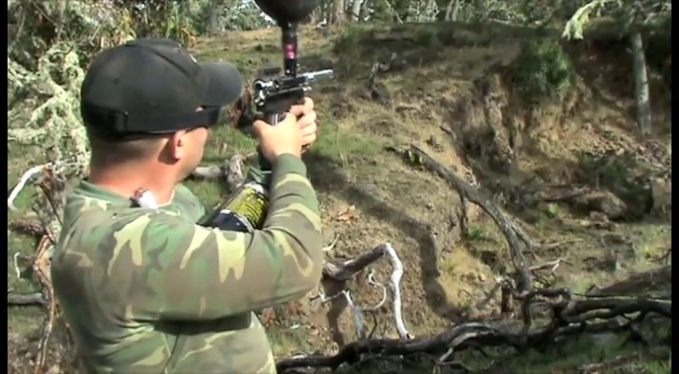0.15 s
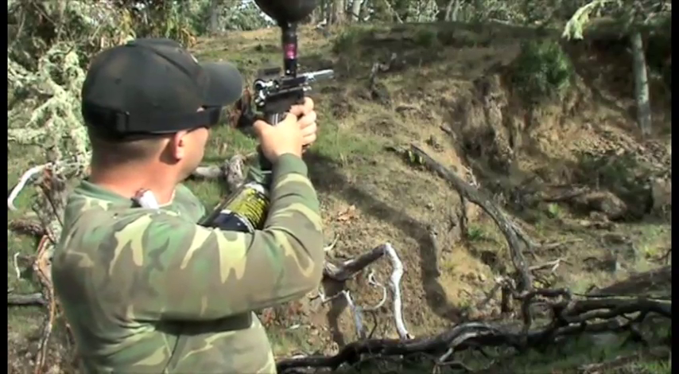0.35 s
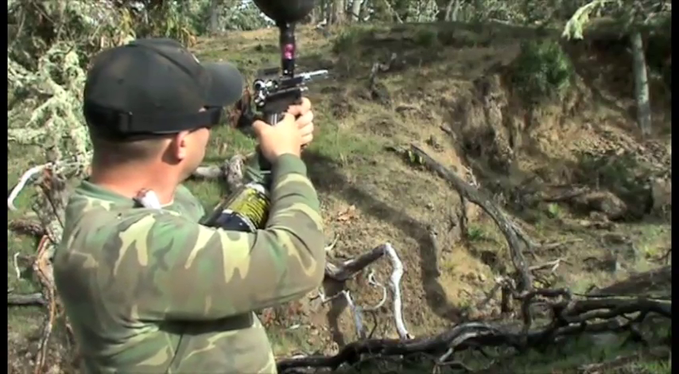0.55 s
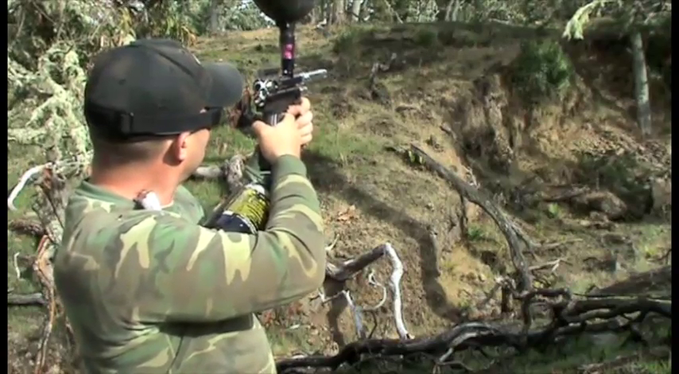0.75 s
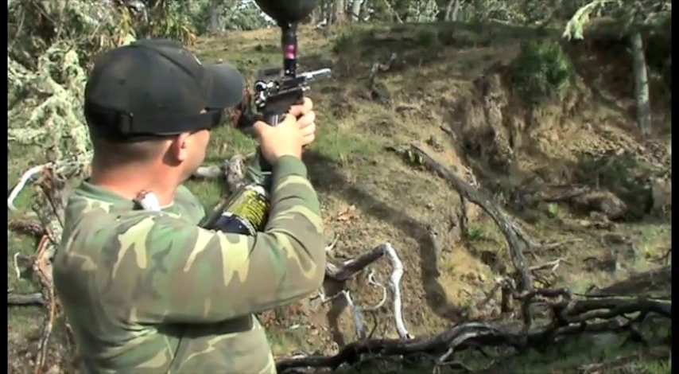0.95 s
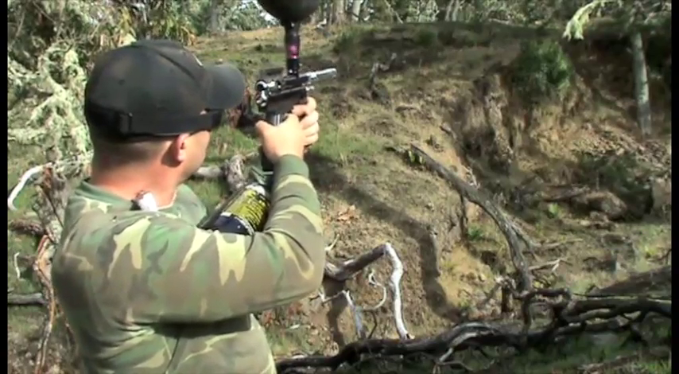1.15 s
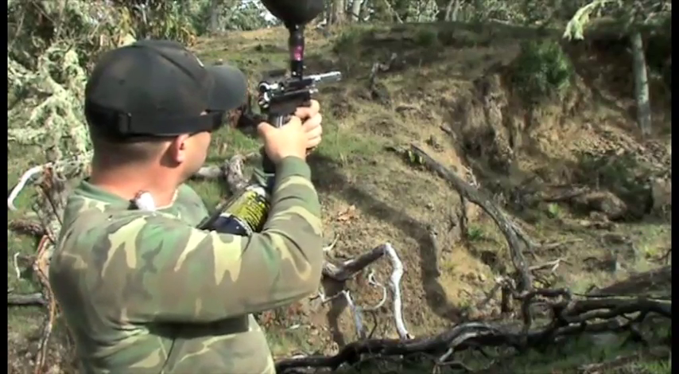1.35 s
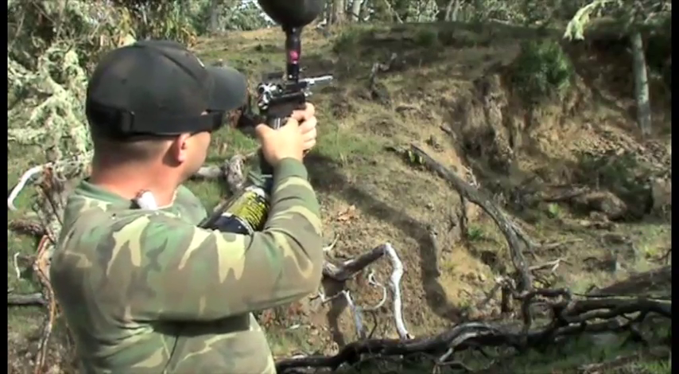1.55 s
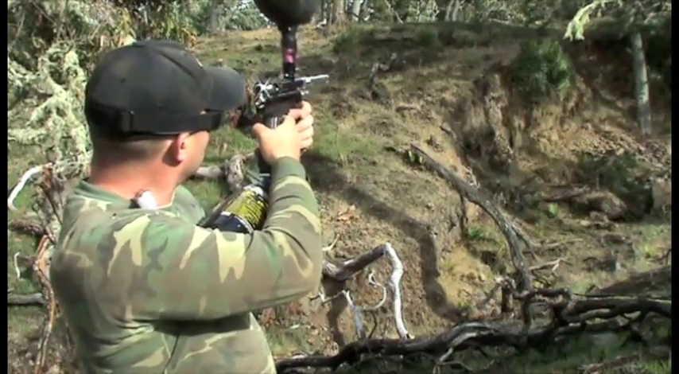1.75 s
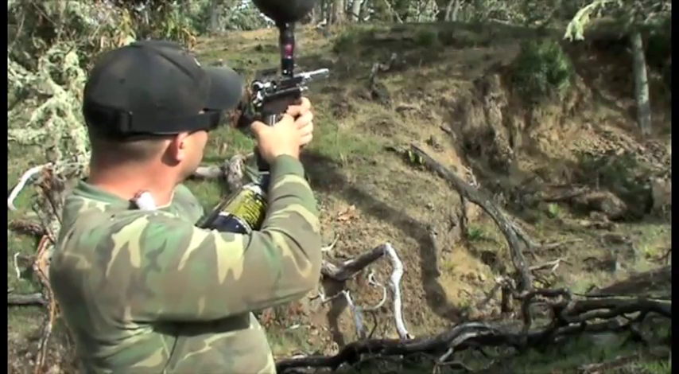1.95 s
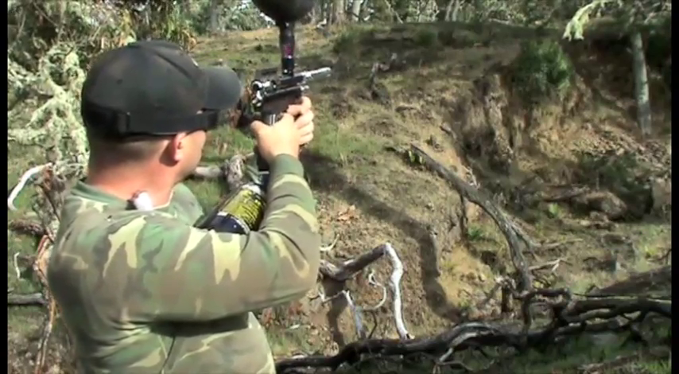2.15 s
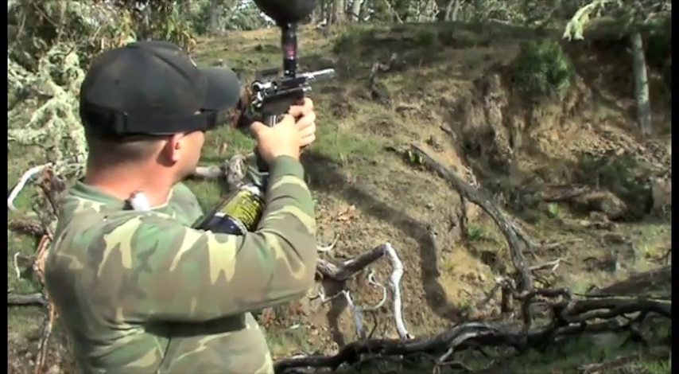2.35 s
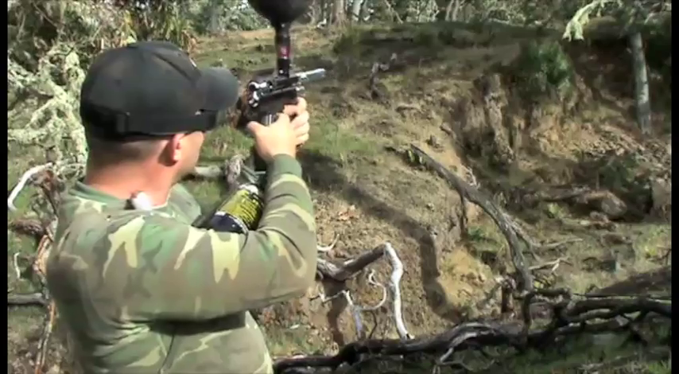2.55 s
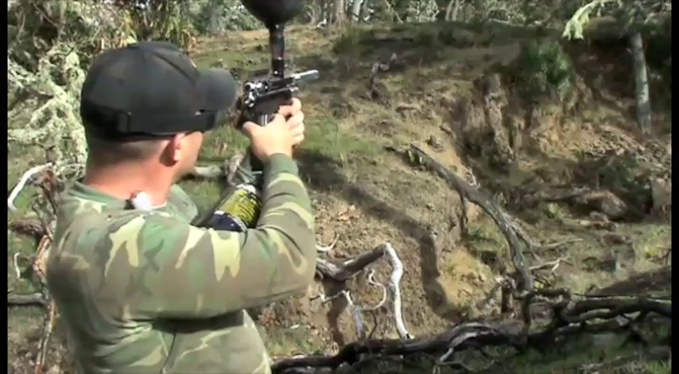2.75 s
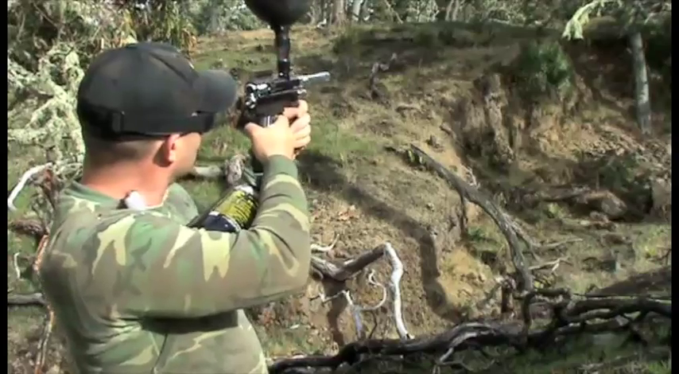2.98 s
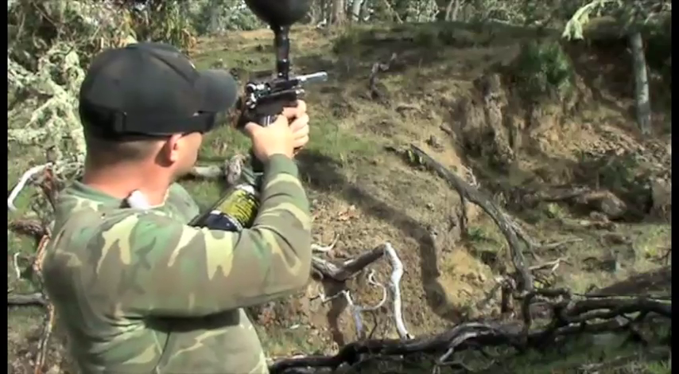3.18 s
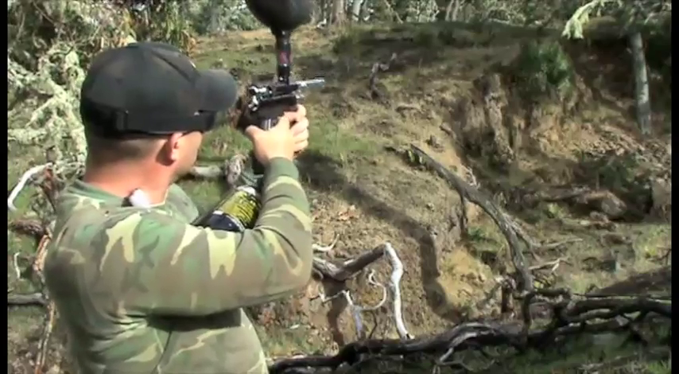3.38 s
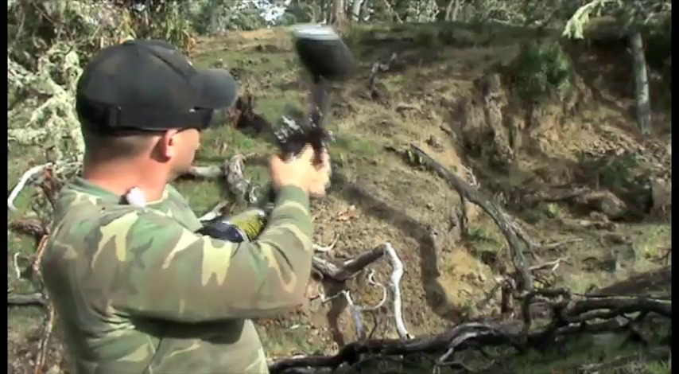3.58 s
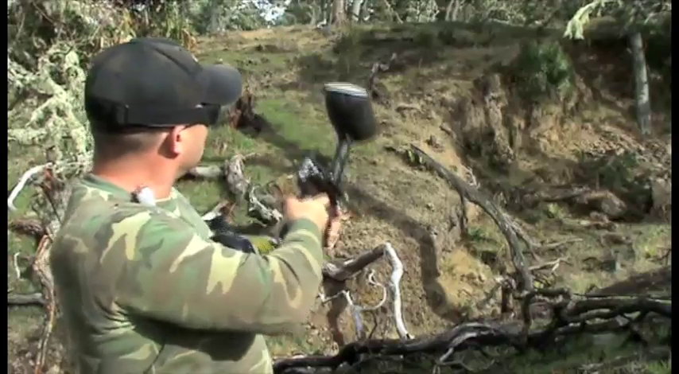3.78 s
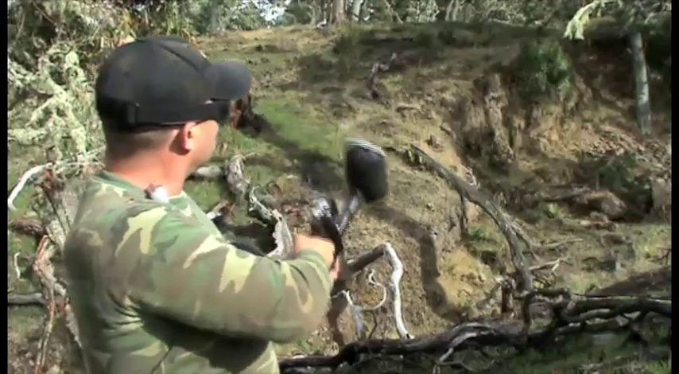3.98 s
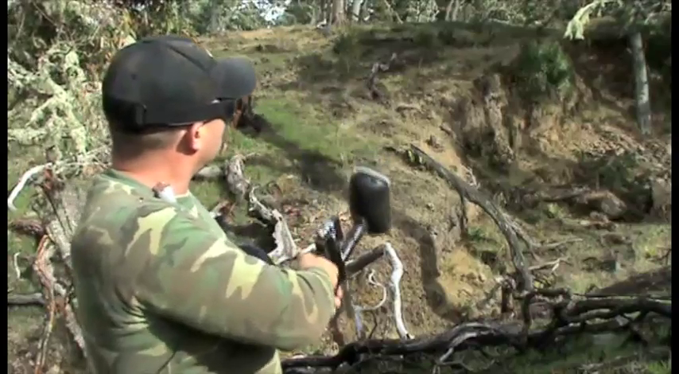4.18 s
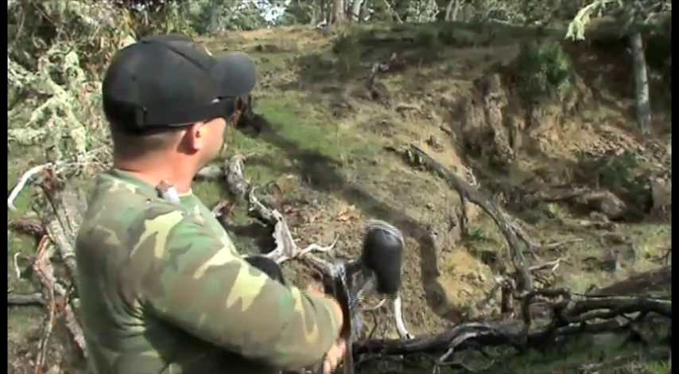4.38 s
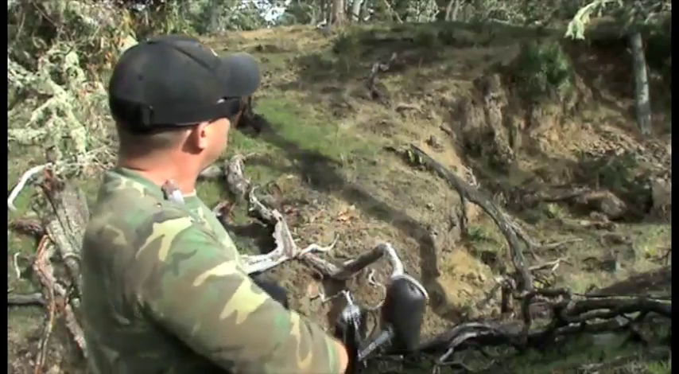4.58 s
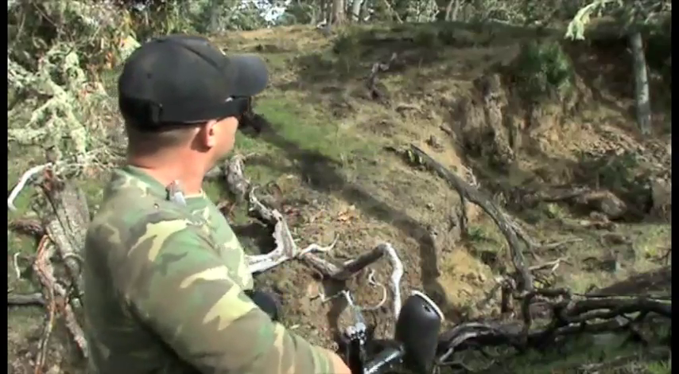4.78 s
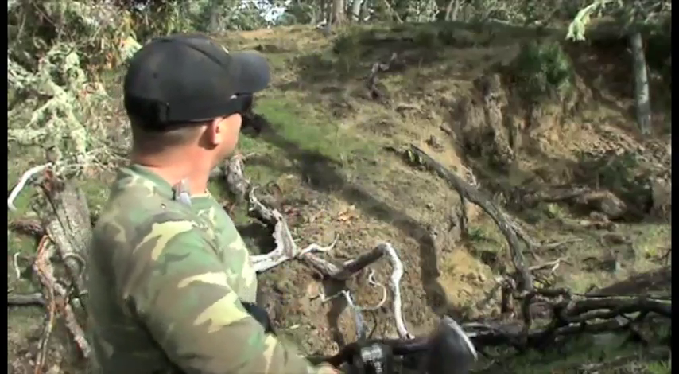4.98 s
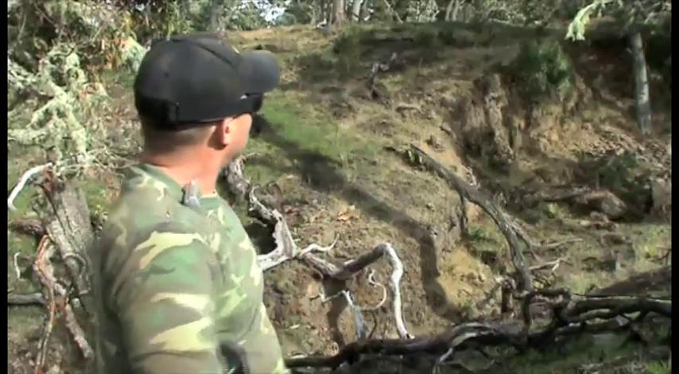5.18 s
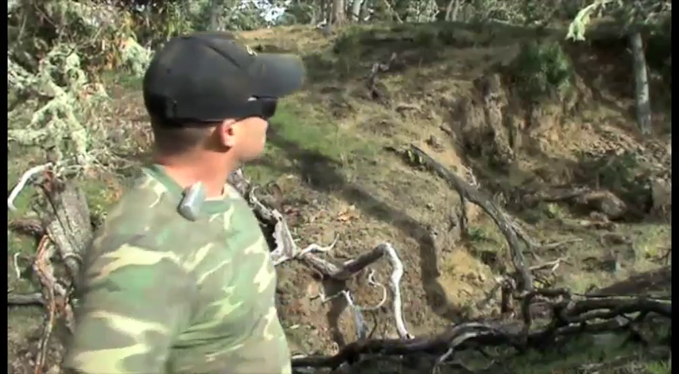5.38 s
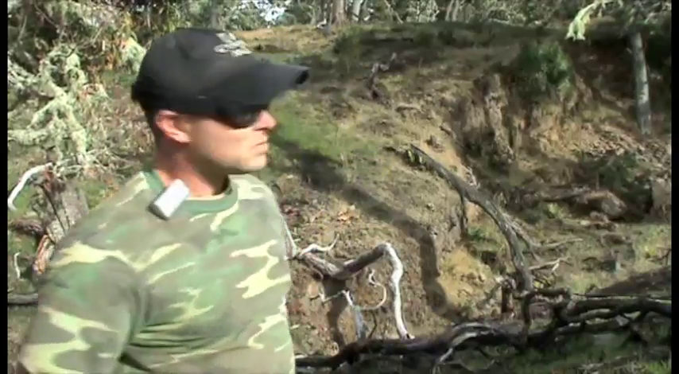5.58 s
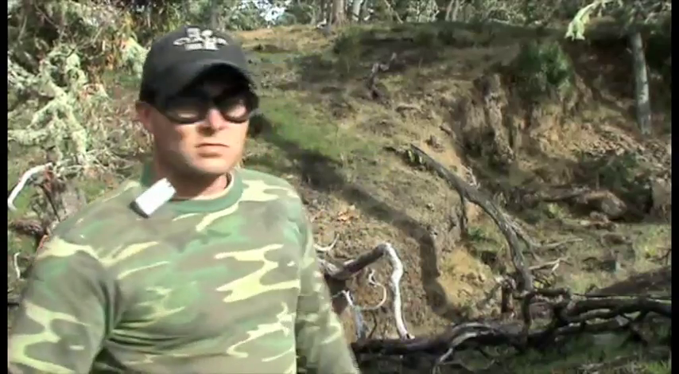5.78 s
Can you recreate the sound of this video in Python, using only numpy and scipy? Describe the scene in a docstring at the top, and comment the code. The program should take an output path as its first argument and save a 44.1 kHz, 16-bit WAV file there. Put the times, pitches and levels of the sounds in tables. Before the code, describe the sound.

A compressed-air paintball gun fires fifteen sharp cracking shots outdoors, spaced then rapid, last two hollow, followed by quiet hiss and small handling knocks.

```python
"""Fifteen shots of a compressed-air paintball gun, close and slightly overloaded, echo off a wooded bank.
Each shot: sear click, swelling leak, fluttering jet that rings the barrel, bolt slam; the metal rings on.
Gas pressure sags shot by shot; balls tick in the hopper; the last two shots sound hollow.
Then the lowered gun gives small knocks, and clothing bumps softly, over air, hiss and a faint whine.
Sources are damped sine modes and coloured noise bursts; echoes are a convolution."""
import sys
import numpy as np
from scipy import signal
from scipy.fft import rfft, irfft
from scipy.io import wavfile

SR = 44100
rng = np.random.default_rng(int(sys.argv[2]) if len(sys.argv) > 2 else 0)


def dump(signal):
    """Clip the signal to [-1, 1] and save it as 16-bit WAV at the path in sys.argv[1]."""
    limited = np.clip(np.atleast_2d(signal).T, -1, 1)
    pcm = np.round(limited * 32767).astype(np.int16)
    wavfile.write(sys.argv[1], SR, pcm)


N = 257103
T = np.arange(N) / SR
RING = T[:SR]  # 1 s

# shots: start_s, sear_db, spring_ping_db, hollow (0 to 1)
SHOTS = [(.0350, -3.5, 1.5, 0.038), (0.4113, -2, 3, 0), (0.7861, -2.5, 0, 0.089),
         (1.1047, -5, -0.5, 0.0047), (1.2884, -6.5, -13, 0), (1.4765, -7, -4, 0.038),
         (1.6950, -7, 2, 0.0033), (2.0948, -5.5, -11.5, 0.04), (2.3005, -5.5, -7.5, 0.021),
         (2.4774, -5.5, 1.5, 0.033), (2.6486, -5.5, -0.5, 0), (2.8334, -4.5, -8.5, 0.011),
         (3.0114, -6, -12.5, 0), (3.1881, -7, -1, 0.94), (3.3654, -7, -4.5, 0.96)]
# barrel air column, full shot: pitch_hz, level_db, t60_s
BARREL = [(385.2, -22, 0.052), (573.7, -39, .04), (747.3, -11.5, 0.045), (1957, -19.5, 0.017),
          (3132, -16.5, 0.019)]
# barrel air column, hollow shot: pitch_hz, level_db, t60_s
HOLLOW = [(185.6, -9.5, 0.025), (789, -23.5, 0.087), (977, -15, .04), (2038, -21, 0.0518)]
# breech air knocked by the returning bolt: pitch_hz, level_db, t60_s
BREECH = [(412, -35.5, .035), (639.7, -22.5, 0.03), (859.7, -14, 0.019), (1220, -30, 0.087)]
# ringing metal of the gun: pitch_hz, mean_level_db, t60_s
METAL = [(1012, -47.5, .95), (1325, -43, .15), (2864, -46, .22), (3381, -54, .5), (5582, -54, .27)]
# high ping of the spring: pitch_hz, level_db, t60_s
PING = [(7381, -45.5, .3)]
# plastic hopper and stock: pitch_hz, level_db, t60_s
HOPPER = [(336.3, -20, .15), (556, -47.5, 0.0276), (748.5, -25, 0.035), (953, -6.5, .025),
          (1364, -7.5, 0.016), (1710, -11.5, 0.018), (2080, -10.5, 0.028), (2340, 1.5, 0.016),
          (2852, -2.5, 0.02), (3665, 1.5, 0.009), (5400, -5, 0.016), (6810, 2.5, .01)]
# noise colour of the sear and of the bolt ticks: frequency_hz, relative_db
SEAR_COLOUR = [(100, -9.5), (270, -18.5), (500, -11), (1000, -12), (1500, -18), (2200, -4.5), (2800, -9),
               (3800, -2), (7200, 3.5), (8500, -4.5), (11000, -7), (15000, -23.5)]
# noise colour of the gas rush: frequency_hz, relative_db
GAS_COLOUR = [(40, 3.5), (200, 1), (500, 4.5), (1100, 3), (1500, -1), (2000, 3), (3200, -1), (5000, -3),
              (7000, -8.5), (10000, -10), (12500, -16), (15000, -21.5)]
# noise colour of the bolt slam: frequency_hz, relative_db
BOLT_COLOUR = [(60, -13), (220, -9.5), (380, 3.5), (850, 7.5), (1400, -2), (2500, 5), (4500, 0.5),
               (7000, 7), (8300, -4), (10000, 0), (15000, -28)]
# noise colour of the spring chatter: frequency_hz, relative_db
CHATTER_COLOUR = [(60, 0), (350, -2.5), (1100, 5.5), (1600, 2.5), (2600, -2.5), (3300, 0), (4200, -2.5),
                  (5600, -6), (7300, -2.5), (8500, -10), (15000, -19.5)]
# narrow barrel radiates little bass: frequency_hz, relative_db
RADIATION = [(40, -16.5), (90, -12.5), (210, -10.5), (300, 2.5), (16000, 2)]
# echoes from the ground and the bank: delay_s, level_db
ECHOES = [(0.022, -40), (0.051, -35), (0.066, -41.5)]
# noise colour of the scatter from many trees: frequency_hz, relative_db
WOODS_COLOUR = [(50, -5.5), (300, 0.5), (700, -3), (1150, -5.5), (1700, 4), (2400, -4), (6000, -0.5),
                (14000, 6)]
# knocks of the lowered gun: start_s, level_db, contact_hz (low-pass), lowest_hz (high-pass),
# rebound_s (after the start), rebound_db (re first knock)
KNOCKS = [(4.1369, -39.5, 7160, 900, 0.0029, -14), (5.0577, -41.5, 3200, 500, .006, -6),
          (5.7958, -37.5, 1090, 270, .009, 0)]
# soft bumps of clothing: peak_s, level_db, centre_hz, sigma_s
BUMPS = [(4.93, -65, 160, .05), (5.0, -53.5, 190, 0.015), (5.45, -69.5, 140, 0.091),
         (5.55, -55, 124, 0.011)]
# noise colour of still air and hiss: frequency_hz, relative_db
AIR_COLOUR = [(15, -44.5), (25, -28), (48, -9), (114, -2.5), (206, -5), (229, -3), (427, -6), (677, -6),
              (818, -5.5), (1040, -8.5), (1560, -8), (2110, -9), (16000, -7)]
# whine of the electronics: pitch_hz, rms_db
WHINE = [(1601, -78.5), (11539, -73.5), (15735, -80)]

FRAME = rng.standard_normal(SR // 4)  # response shared by all blows on the frame

# pressure sag per shot: lower flutter, softer bolt
FLUTTER_HZ, FLUTTER_SAG_HZ_PER_SHOT = 1086.6, 1.6
BOLT_DB, BOLT_SAG_DB_PER_SHOT = -0.17, .27
BLAST_DB, BOLT_RETURN_S = -1.05, .011
# changes on a fully hollow shot: louder blast, lower flutter, later and slightly louder bolt
HOLLOW_DB, HOLLOW_DROP_HZ, HOLLOW_LATE_S, HOLLOW_BOLT_DB = 1.4, 35, 0.0037, 1
# trunk echoes: delay range, level at the near end
TRUNK_NEAR_S, TRUNK_FAR_S, TRUNK_DB = 0.13, 0.22, -50.5
# balls settling after each shot: mean and spread of delay and level, low-pass
SETTLE_S, SETTLE_SCATTER_S, SETTLE_DB, SETTLE_SCATTER_DB, SETTLE_HZ = .106, .005, -51.5, 2.5, 7500
AIR_DB, TOP_HZ = -57, 16000


def gun(sear_lead_s=.0159, hollow_metal_db=-4, jitter_s=.0003):
    """Each shot cycles sear, blast and bolt; each blow excites the metal modes at slightly new levels."""
    out = np.zeros(N)
    lead_s = .03  # room for the swells before firing
    t = T[:SR // 4] - lead_s
    for fired, (start_s, sear_db, ping_db, hollow) in enumerate(SHOTS):
        hollow = np.clip(hollow, 0, 1)
        flutter_hz = FLUTTER_HZ - FLUTTER_SAG_HZ_PER_SHOT * fired - HOLLOW_DROP_HZ * hollow
        bolt_db = BOLT_DB - BOLT_SAG_DB_PER_SHOT * fired + HOLLOW_BOLT_DB * hollow
        bolt_s = BOLT_RETURN_S + HOLLOW_LATE_S * hollow + jitter_s * rng.standard_normal()

        shot = undb(BLAST_DB + HOLLOW_DB * hollow) * blast(t, flutter_hz, hollow)
        shot += undb(sear_db) * sear(t + sear_lead_s)
        shot += undb(bolt_db) * bolt(t - bolt_s)
        add(out, start_s - lead_s, shot)

        struck = [(hz, db + rng.standard_normal(), t60_s) for hz, db, t60_s in METAL]
        metal = undb(hollow * hollow_metal_db) * ring(RING, struck)
        add(out, start_s + bolt_s, metal + undb(ping_db) * ring(RING, PING))
    return out


def blast(t, flutter_hz, hollow, open_s=0.003695, hollow_open_s=0.0025, jet_db=-4,
          puff_s=.0042, puff_db=-8, gas_db=-21, leak_db=-25, shut_db=-19):
    """The open valve's fluttering jet rings the barrel; a hollow shot opens shorter and puffs again."""
    length_s = open_s + hollow * (hollow_open_s - open_s)
    jet = undb(jet_db) * np.sin(2 * np.pi * flutter_hz * t) * gate(t, length_s)
    puff = undb(puff_db) * np.sin(2 * np.pi * 1000 * (t - puff_s)) * gate(t - puff_s, .0022)
    detune = 1 + 0.016 * rng.standard_normal()
    full_barrel = ring(t, BARREL, detune)
    hollow_barrel = ring(t, HOLLOW, detune) - puff
    barrel = (1 - hollow) * full_barrel + hollow * hollow_barrel

    leak = undb(leak_db) * burst(t, 0.015, .065)  # past the moving bolt
    flow = undb(gas_db) * gate(t, length_s)
    spit = undb(shut_db) * burst(t - length_s, 0.0024, 0.0063)  # as the valve shuts
    return (leak + flow + spit) * noise(GAS_COLOUR, len(t)) - jet - barrel


def sear(t, tick_db=-18, slide_db=-27, rough_db=3):
    """The trigger frees the hammer: a bright tick, and an uneven scrape as it slides forward."""
    tick = undb(tick_db) * burst(t, 0.002936, 0.01) * clack(SEAR_COLOUR, len(t))
    slide = undb(slide_db + rough_db * flicker(len(t), 1000)) * burst(t, 0.0081, 0.02)
    return tick + slide * clack(SEAR_COLOUR, len(t))


def bolt(t, slam_db=-19, tick_db=-21, chatter_db=-35, rattle_db=4, bounce_s=0.01, bounce_db=-37):
    """The bolt slams back with a tick, rings the breech air and bounces once; the spring chatters on."""
    slam = undb(slam_db) * burst(t, 0.014, 0.028) * clack(BOLT_COLOUR, len(t))
    breech = ring(t, BREECH, 1 + 0.01592 * rng.standard_normal())
    tick = undb(tick_db) * burst(t, 0.002, .008)
    bounce = undb(bounce_db) * burst(t - bounce_s, 0.0082, 0.01978)
    rattle = undb(chatter_db + rattle_db * flicker(len(t))) * burst(t, .01, 0.19)
    chatter = rattle * noise(CHATTER_COLOUR, len(t))
    return slam + breech + (tick + bounce) * clack(SEAR_COLOUR, len(t)) + chatter


def clack(points, size):
    """Dense response of the frame: partly alike from blow to blow, partly new."""
    return colour(FRAME + np.sqrt(2) * rng.standard_normal(size), points) / np.sqrt(3)


def woods(x, scatter_db=-63, t60_s=1.85, patchy_db=6, smear_db=-19, dull_hz=2500):
    """Distinct dull echoes, smeared by rough ground, over 1 s of patchy scatter from many trees."""
    patches = undb(scatter_db + patchy_db * flicker(SR, 200))
    scatter = patches * noise(WOODS_COLOUR, SR) * fade(RING, t60_s) * np.clip(RING / 0.04, 0, 1)
    slaps = np.zeros(SR)
    for delay_s, db in ECHOES + trunks():
        slaps += undb(db + smear_db) * fade(RING - delay_s, .009) * rng.standard_normal(SR)
        slaps[int(delay_s * SR)] += undb(db)
    return signal.fftconvolve(x, scatter + filtered(slaps, dull_hz, "low"))[:N]


def trunks(count=10):
    """Echoes (delay_s, level_db) of trunks scattered in depth, weaker the further they stand."""
    depth = (np.arange(count) + rng.random(count)) / count
    delays_s = TRUNK_NEAR_S + (TRUNK_FAR_S - TRUNK_NEAR_S) * depth
    return [(delay_s, TRUNK_DB - 20 * np.log10(delay_s / TRUNK_NEAR_S)) for delay_s in delays_s]


def settling():
    """Balls settle after each shot: one small tick of the hopper modes."""
    out = np.zeros(N)
    for shot, (late, strong) in zip(SHOTS, rng.standard_normal((len(SHOTS), 2))):
        tick_s = shot[0] + SETTLE_S + SETTLE_SCATTER_S * late
        tick_db = SETTLE_DB + SETTLE_SCATTER_DB * strong
        add(out, tick_s, undb(tick_db) * knock(SETTLE_HZ))
    return out


def handling():
    """The lowered gun knocks, each knock rebounding once; clothing bumps are swells of low noise."""
    out = np.zeros(N)
    for start_s, db, contact_hz, lowest_hz, rebound_s, rebound_db in KNOCKS:
        add(out, start_s, undb(db) * knock(contact_hz, lowest_hz))
        add(out, start_s + rebound_s, undb(db + rebound_db) * knock(contact_hz, lowest_hz))
    for peak_s, db, hz, sigma_s in BUMPS:
        cloth = noise([(hz / 4, -18), (hz, 0), (hz * 2, -12), (hz * 20, -50)], SR)
        swell = np.exp(-.5 * ((RING - .5) / sigma_s) ** 2)
        add(out, peak_s - .5, undb(db) * swell * cloth)
    return out


def knock(contact_hz, lowest_hz=800, scuff_db=-2):
    """A knock rings hopper and stock: duller for a soft contact, thinner for a light one."""
    t = T[:SR // 8]
    modes = ring(t, HOPPER, 1 + 0.034 * rng.standard_normal())
    scuff = undb(scuff_db) * fade(t, .018) * rng.standard_normal(len(t))
    return filtered(filtered(modes + scuff, contact_hz, "low"), lowest_hz, "high", order=4)


def background(side_db=-61.0):
    """Still air and microphone hiss with steady sine whines; much of the hiss differs between channels."""
    whine = sum(undb(db) * np.sqrt(2) * np.sin(2 * np.pi * hz * T) for hz, db in WHINE)
    mid = undb(AIR_DB) * noise(AIR_COLOUR, N) + whine
    side_colour = [(20, -14), (60, -1.5), (200, 0.5), (1300, -1.5), (3000, 1.0), (8000, 1.0), (15000, -0.5)]
    side = undb(side_db) * noise(side_colour, N)
    return np.array([mid + side, mid - side])


def undb(db):
    """Decibels to gain."""
    return 10 ** (np.asarray(db) / 20)


def fade(t, t60_s):
    """Exponential decay from t = 0, silent before."""
    return (t >= 0) * np.exp(-np.log(1000) * np.abs(t) / t60_s)


def burst(t, rise_s, t60_s):
    """Exponential swell over the last 60 dB in rise_s up to t = 0, then a decay."""
    return np.where(t < 0, fade(-t, rise_s), fade(t, t60_s))


def gate(t, length_s, edge_s=0.001):
    """A valve that opens from t = 0 and shuts around length_s, with linear edges."""
    opening = np.clip(t / edge_s, 0, 1)
    return opening * np.clip((length_s - t) / edge_s + .5, 0, 1)


def ring(t, modes, detune=1):
    """Damped modes struck at t = 0."""
    return sum(undb(db) * np.sin(2 * np.pi * hz * detune * t) * fade(t, t60_s) for hz, db, t60_s in modes)


def colour(x, points):
    """Shape the spectrum by (Hz, dB) points on log frequency, keeping the power of white noise."""
    hz, db = np.transpose(points)
    bins_hz = np.fft.rfftfreq(len(x), 1 / SR)
    gain = undb(np.interp(np.log(bins_hz + 1), np.log(hz), db))
    return irfft(rfft(x) * gain / np.sqrt(np.mean(gain ** 2)), len(x))


def noise(points, size):
    """Coloured noise of unit power."""
    return colour(rng.standard_normal(size), points)


def flicker(size, rate_hz=400):
    """Random levels joined by straight lines."""
    return np.interp(T[:size] * rate_hz, np.arange(size), rng.standard_normal(size))


def filtered(x, hz, kind, order=2):
    """Butterworth low-pass or high-pass."""
    return signal.sosfilt(signal.butter(order, min(hz, .45 * SR), kind, fs=SR, output="sos"), x)


def add(track, start_s, x):
    """Mix x into the track from start_s, trimmed to the track."""
    start = int(round(start_s * SR))
    x, start = x[max(-start, 0):], max(start, 0)
    track[start:start + len(x)] += x[:N - start]


def scene(width_db=-21, woods_width_db=-18):
    """Gun and handling in the centre, treble and echoes slightly spread, over the background."""
    shots = colour(gun(), RADIATION)
    # shot treble, delayed 1 ms, differs between the channels
    treble = np.roll(filtered(shots, 5000, "high", order=4), SR // 1000)
    side = undb(width_db) * treble + undb(woods_width_db) * woods(shots)
    mid = shots + woods(shots) + settling() + handling()
    return mid + np.array([side, -side]) + background()


def record(dry, ceiling=0.93):
    """The microphone rounds the blast peaks; a steep low-pass cuts the top."""
    rounded = ceiling * np.tanh(dry / ceiling)
    return signal.sosfilt(signal.ellip(10, .2, 70, TOP_HZ, fs=SR, output="sos"), rounded)


dry = scene()
out = record(dry)
dump(out)
```